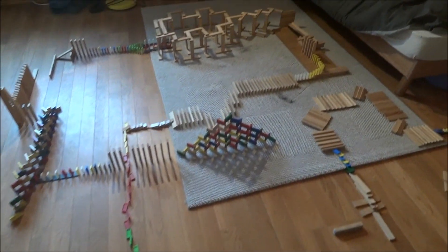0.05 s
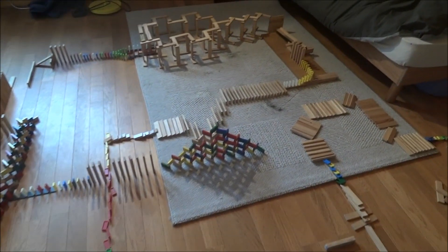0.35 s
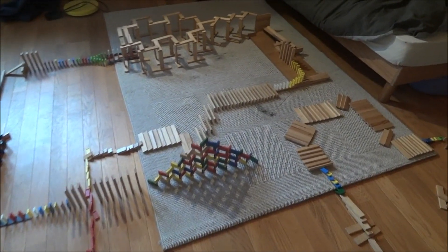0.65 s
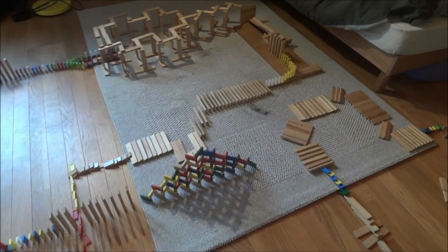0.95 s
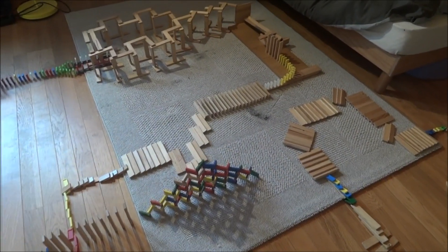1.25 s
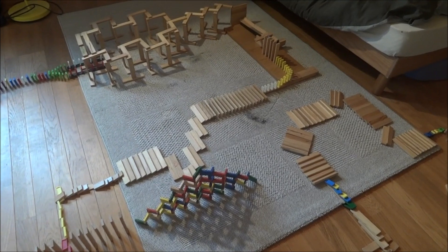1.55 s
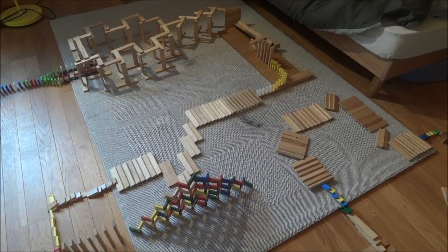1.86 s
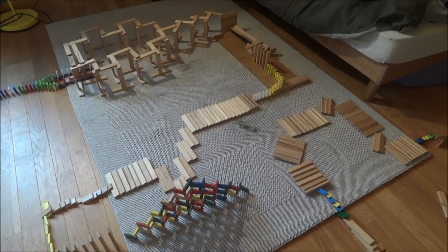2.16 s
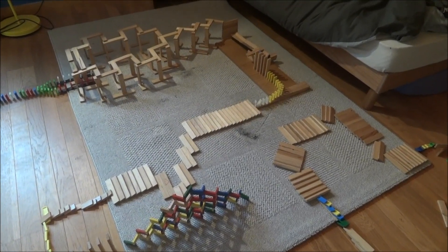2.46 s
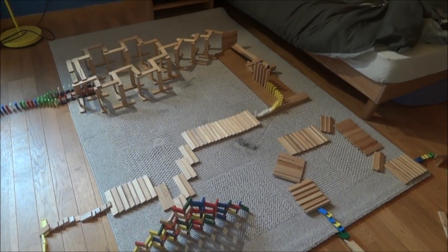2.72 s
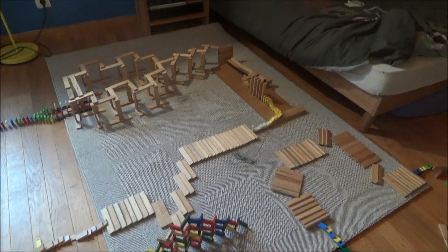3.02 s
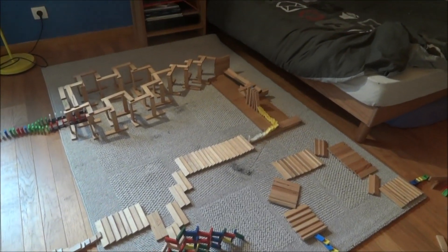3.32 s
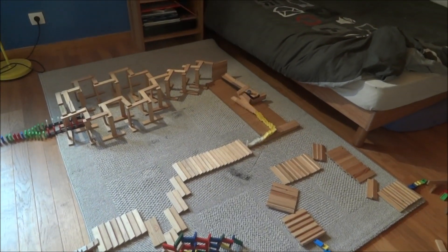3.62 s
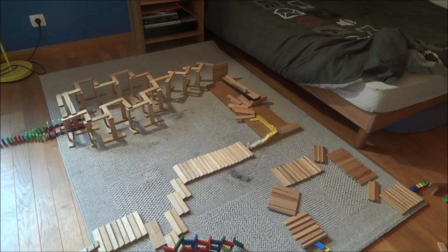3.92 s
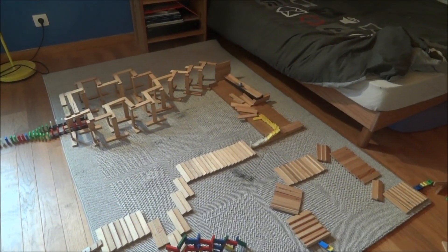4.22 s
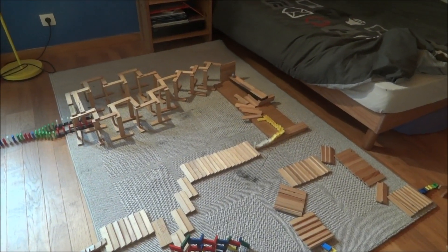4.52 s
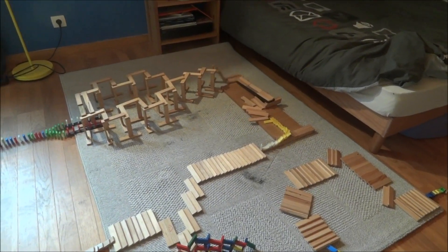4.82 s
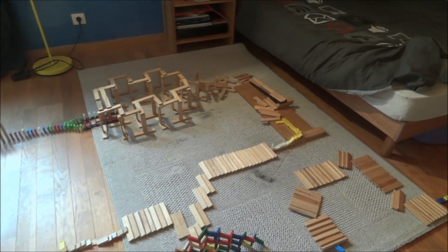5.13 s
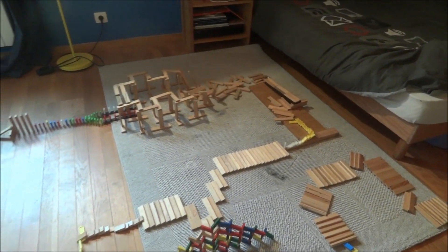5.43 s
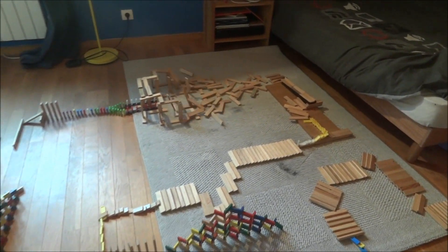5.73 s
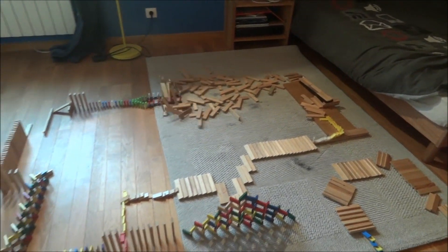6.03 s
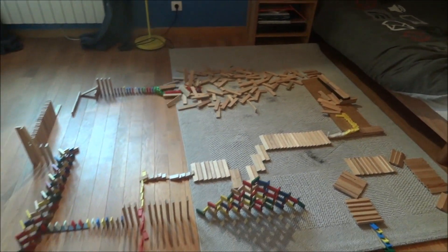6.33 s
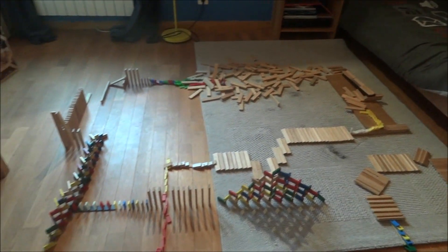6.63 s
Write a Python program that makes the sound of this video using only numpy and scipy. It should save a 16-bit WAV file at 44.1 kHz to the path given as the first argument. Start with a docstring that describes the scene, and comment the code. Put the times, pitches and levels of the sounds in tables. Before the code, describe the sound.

Wooden planks clack over one after another and dominoes tick along, building to a clattering collapse in a quiet room.

```python
"""Toppling planks and dominoes in a bedroom

Wooden planks clack over one by one across a rug and a wooden floor, dominoes tick along, a stack
tips onto a board, then a long scaffold of planks collapses and sets off more dominoes. Each blow
rings the piece's bending modes, snaps at the contact and knocks on what lies beneath.
Heard from close by on a hand-held camera's microphones, with short echoes and still air behind."""
import sys
import numpy as np
from scipy import signal
from scipy.io import wavfile
from scipy.ndimage import uniform_filter1d, minimum_filter1d

SR = 44100
rng = np.random.default_rng(int(sys.argv[2]) if len(sys.argv) > 2 else 0)


def materialize(psi):
    """Save the field psi as 16-bit PCM at rate SR to the path in sys.argv[1].

    A 1-D psi becomes a single channel; in a 2-D psi each row is a channel.
    """
    bounded = np.clip(np.atleast_2d(psi).T, -1, 1)
    quanta = np.round(bounded * 32767).astype(np.int16)
    wavfile.write(sys.argv[1], SR, quanta)


N = 302967
TIME = np.arange(N) / SR
BLOW = np.arange(3072) / SR  # seconds since a blow

# One plank hits the next, close by. Ring is its lowest modes, bright its overtones and snap.
# Each row: start in seconds, ring and bright in relative dB, pitch in Hz.
PLANK_HITS = [(.1846, -7, -30, 2230), (.2326, -7, -23.5, 3460), (.2907, -8, -26.5, 2645),
              (.3432, -6.5, -31, 2837), (.4062, -15, -49, 2660), (.4773, -12.5, -37, 2900),
              (.5568, -9.5, -44, 2717), (.6144, -11.5, -33, 2700), (.7235, -27, -44, 2595),
              (.814, -18, -47, 2835), (.873, -10, -41, 2804), (.9476, -12, -39, 2636),
              (.963, -11, -34.5, 2860), (1.0131, -11.5, -32, 2587), (1.1181, -9.5, -37.5, 2657),
              (1.183, -14, -34.5, 3117), (1.264, -6, -37, 2924), (1.2905, -23, -38, 2770),
              (1.4862, -8, -27, 2335), (1.5489, -9, -35, 2780), (1.6027, -7.5, -29, 3216),
              (1.6604, -7.5, -23, 2810), (1.706, -6, -26.5, 2793), (1.7402, -5.5, -27, 2750),
              (1.7782, -9.5, -27.5, 2160), (1.8247, -1, -32, 2574), (1.8717, -2.5, -22, 2750),
              (1.9144, -6, -28, 3420), (1.9579, -10.5, -24, 3250), (2.0105, -10.5, -40, 3330),
              (2.0473, -13, -28.5, 2760), (2.0921, -8, -26, 2955), (2.134, -9.5, -23.5, 2770),
              (2.176, -5, -20.5, 2740), (2.2242, -11.5, -19.5, 2770), (2.2623, -16.5, -56, 3140),
              (2.6967, -28, -47, 2710), (4.6668, -6, -20.5, 2750), (4.6978, -3.5, -27, 2920),
              (4.7489, 1, -14.5, 2705), (4.81, -4.5, -24, 2740), (4.8311, -4, -14.5, 3013),
              (5.034, -11.5, -19, 2930), (5.081, 1.5, -19, 2820), (5.1145, -1.5, -18, 2637),
              (5.1777, -3.5, -10.5, 2750), (5.246, -11, -41, 2643), (5.3761, -5, -22, 2680),
              (5.3875, -7.5, -12.5, 2650), (5.492, -12, -12, 2590), (5.5736, 3, -18, 2837),
              (5.6147, -3.5, -16, 2547), (5.6319, -11, -13.5, 2524), (5.874, -3.5, -47, 2520),
              (5.9194, -1, -53, 2540)]
# Fallen planks slip and chatter; in the last stretch the scaffold's first planks land with hollow knocks.
# One curve per stretch. Each row: time in seconds, ring, bright and knock in relative dB.
PLANK_CHATTER = [
    [(.19, -32, -44, -23), (.33, -32, -36, -18), (.42, -22, -32, -23), (.75, -23, -38.5, -36)],
    [(.95, -17, -43, -42), (1.32, -37, -48, -19)],
    [(1.5, -33, -37, -22.5), (1.85, -20, -32, -13.5), (2.1, -21, -44, -18.5), (2.3, -19, -24, -15.5)],
    [(4.745, -26, -40, -12), (4.8, -39, -36, -23), (4.88, -32, -40, -23), (5.0, -30, -36, -12),
     (5.11, -20, -24, -25)],
]
# A plank's modes, lowest first. Each row: frequency in Hz, level in dB, t60 in seconds.
PLANK_MODES = [(2750, 0, 0.069), (3420, -3, 0.017), (5950, 4.5, 0.0029), (6683, 3.5, 0.015),
               (7330, -2, 0.05), (10940, -16.5, 0.015)]
# Edges snapping together, and the knock on the rug. Each row: frequency in Hz, density in dB.
WOOD_SNAP = [(1500, -20), (3300, 7), (5000, 8), (6800, -1), (7700, 8), (9000, 3.5), (12800, 5),
             (14000, -10), (16000, -70)]
RUG_KNOCK = [(100, -47), (250, -52), (550, -7), (950, -1), (1600, 4.5), (2300, 8), (3700, 4), (5000, -9),
             (9000, -48), (16000, -58)]
# A kind of piece: modes, snap colour, knock colour, then ring, overtone, snap and knock weights in dB.
PLANK = (PLANK_MODES, WOOD_SNAP, RUG_KNOCK, [-6.5, -5.5, -8.5, -4.5])
# The hollow floor under the planks. Each row: resonance in Hz, width in Hz, gain in dB.
HOLLOW_FLOOR = [(734, 120, -21), (980, 53, 3.5), (1220, 140, -3.5)]


def planks(airborne_s=5.1, airborne_db=-27):
    """Planks clack over in a row, slip and chatter; the scaffold's first planks land with hollow knocks."""
    hits = single_blows(PLANK_HITS, [-11., -2.], knock_db=-10.5, heaviest_db=-24.5)
    hits[:, 3] += airborne_db * (hits[:, 0] > airborne_s)  # planks meeting in mid-air hardly knock
    clacks = strike(PLANK, hits, snap_t60=0.013, knock_t60=0.026, scatter=0.036, snap_db=-4.5)
    chatter = np.vstack([shower(curve, 80, 2800, 0.065, 6.0, [-9., -10., -5.])
                         for curve in PLANK_CHATTER])
    return hollow(clacks + strike(PLANK, chatter, snap_db=5.0), HOLLOW_FLOOR)


# Loose planks spill over the floor; the scaffold comes down bay by bay.
# Each row: start and length in seconds, ring and bright in relative dB.
SPILLS = [(0, .045, -14.5, -13), (6.772, 0.056, -20.5, -17)]
SCAFFOLD_BAYS = [(4.745, .04, -17, -24), (4.84, 0.058, -7, -11.5), (5.12, 0.19, -9, -15.5),
                 (5.255, 0.039, -15.5, -12), (5.375, 0.15, -15, -19), (5.51, 0.099, -19, -20),
                 (5.63, 0.14, -10, -13.5), (5.73, 0.15, -15, -16), (5.9, 0.096, -10.5, -16),
                 (5.99, 0.18, -11, -13.5), (6.19, 0.062, -25, -14), (6.33, 0.12, -16, -23.5)]
# The later bays drum harder on the floor. Each row: time in seconds, gain in dB.
SCAFFOLD_WEIGHT = [(4.7, -45), (5.2, -16.5), (5.45, -18), (6.6, -15.5)]


def collapses():
    """Groups of planks give way together: two brief spills and the scaffold's long fall onto the rug."""
    spills = np.zeros(N)
    for group in SPILLS:
        fall = giving_way([group], rise_s=0.0013, ring_db_per_s=95.0, bright_db_per_s=289.0,
                          drop_s=0.0019, knock_db=-5.0)
        blows = shower(fall, 300, 3080, 0.0176, 1.25, [-1., -3., 1.])
        spills += strike(PLANK, blows, scatter=0.096, snap_db=7.0)
        spills += drumming(fall, level_db=-21.0)
    fall = giving_way(SCAFFOLD_BAYS, rise_s=0.004, ring_db_per_s=162.0, bright_db_per_s=192.0,
                      drop_s=0.107, knock_db=-11.5)
    blows = shower(fall, 130, 2720, 0.0819, 4.0, [-1., -1., -1.])
    scaffold = strike(PLANK, blows, knock_t60=0.027, scatter=0.0593, snap_db=1.5)
    return spills + scaffold + drumming(fall, level_db=3.5) * follow(SCAFFOLD_WEIGHT)


# One domino hits the next. Each row: start in seconds, ring and bright in relative dB.
DOMINO_HITS = [(2.333, -3, -25.5), (2.3514, -1.5, -29), (2.5985, -13.5, -28), (2.6574, -22, -22),
               (2.6967, -31, -16.5), (2.7287, -5, -14), (2.7576, -7, -16.5), (2.7914, -23, -16.5),
               (2.828, -10, -26), (2.8635, -9, -29.5), (2.8944, -5.5, -18.5), (2.9111, -2, -24.5),
               (2.9407, -1.5, -36), (2.9783, -4, -30), (3.0024, -2, -12), (3.039, -8, -12),
               (6.5952, -8, -26), (6.6675, -2, -23)]
# Two fast runs: the climb onto the board, and the last line running off.
# Each row: time in seconds, ring, bright and knock in relative dB.
DOMINO_RUNS = [
    [(2.93, -30, -47, -24), (3.08, -8, -36, -18), (3.158, -8, -23, -12), (3.22, -18, -41, -19.5)],
    [(6.22, -40, -19, -7.5), (6.36, -13, -19.5, -5.5), (6.5, -11, -8.5, -4), (6.62, -5.5, -12.5, -5.5),
     (6.75, -22, -24, -7)],
]
# A domino's modes. Each row: frequency in Hz, level in dB, t60 in seconds.
DOMINO_MODES = [(4760, 6.5, 0.046), (4900, -2, 0.011), (7850, 9, 0.029), (10620, 11, 0.041)]
# Its snap, and its knock on the ground. Each row: frequency in Hz, density in dB.
DOMINO_SNAP = [(2000, -13), (3900, -3), (4800, 14), (6300, -9), (8000, -34), (9000, 2.5), (10500, 4),
               (11800, -6), (13500, -28), (16000, -55)]
DOMINO_KNOCK = [(100, -27), (400, -1), (620, -4.5), (850, -10), (1250, 2), (1800, 6), (2900, 12), (3700, 8),
                (6000, 6), (9000, 9.5), (16000, -3.5)]
DOMINO = (DOMINO_MODES, DOMINO_SNAP, DOMINO_KNOCK, [-9.5, -7, -16.5, -7])
# The hollow board they climb onto. Each row: resonance in Hz, width in Hz, gain in dB.
HOLLOW_BOARD = [(592, 15, 10), (1158, 31, 4), (1605, 15, -17)]


def dominoes(pitch_hz=4786, spread=0.0056):
    """Small hard tiles, all alike, tick at nearly one high pitch; in the fast runs the ticks merge."""
    pitches = pitch_hz * (1 + spread * rng.standard_normal(len(DOMINO_HITS)))
    rows = np.column_stack([DOMINO_HITS, pitches])
    hits = single_blows(rows, [-12., -2.], knock_db=-36.0, heaviest_db=-30.)
    ticks = strike(DOMINO, hits, snap_t60=0.0047, knock_t60=0.0207, scatter=0.0023,
                   overtone_share=0., snap_db=3.0, hardening=0.11)
    climb = shower(DOMINO_RUNS[0], 120, 4850, 0.048, 4.3, [-6., -6., -3.])
    last_run = shower(DOMINO_RUNS[1], 130, 4800, 0.015, 3.8, [-1., -3., -7.])
    on_board = hollow(strike(DOMINO, climb, scatter=.05, snap_db=5.0), HOLLOW_BOARD)
    return ticks + on_board + strike(DOMINO, last_run, scatter=0.0084, snap_db=5.0)


# Pieces land on bare wood. Each row: start in seconds, ring and bright in relative dB, pitch in Hz.
BOARD_HITS = [(3.0775, -24, -20.5, 2950), (3.1095, -25, -15.5, 3000), (3.1363, -14, -29, 2980),
              (3.1575, -2.5, -10.5, 2870), (3.2497, -33, -25.5, 2910), (3.3372, -33, -24.5, 2610),
              (3.4029, -31, -22.5, 2440), (3.454, -12, -19, 2880), (3.5785, -4, -19.5, 2580),
              (3.7565, -1, -21, 2180), (4.4025, -16.5, -43, 2270), (4.621, -17.5, -45, 2450),
              (6.756, -3.5, -24.5, 2480), (6.7834, -6.5, -31, 2230), (6.8151, -8.5, -34, 2190)]
# The stack tips in three parts, a little right of the microphones.
# Each row: start and length in seconds, ring and bright in relative dB.
STACK_FALLS = [(3.578, 0.054, -22.5, -13.5), (3.655, 0.051, -21, -8.5), (3.765, .185, -11, -16)]
# The heap shifts and settles. Each row: time in seconds, ring, bright and knock in relative dB.
SETTLING = [(4.15, -62, -69, -67), (4.462, -33, -45, -44), (4.58, -29, -72, -49)]
# Modes of a piece on the board, and in the stack. Each row: frequency in Hz, level in dB, t60 in seconds.
BOARD_MODES = [(2530, -2, 0.071), (3040, 12, 0.005), (6270, 4, 0.019), (7690, 5, 0.017), (11100, -17, 0.02)]
STACK_MODES = [(2430, 4, 0.032), (2900, 4.5, 0.034), (4720, -3.5, .015), (5190, -0.5, 0.019),
               (5750, -4, 0.051), (6530, -1, 0.011), (7480, 6, 0.0043)]
# The knock on bare wood. Each row: frequency in Hz, density in dB.
BOARD_KNOCK = [(100, -13), (220, -11.5), (600, 0), (830, 0.5), (1200, 5), (1900, 8), (4500, 3.5),
               (7000, -18.5), (10000, -52), (16000, -45)]
ON_BOARD = (BOARD_MODES, WOOD_SNAP, BOARD_KNOCK, [-8, -9.5, -21.5, 0.5])
STACKED = (STACK_MODES, WOOD_SNAP, BOARD_KNOCK, [-12, -8, -11, 0])


def stack():
    """A stack crashes onto a board and settles; other pieces land on bare wood."""
    hits = single_blows(BOARD_HITS, [-12., 0.], knock_db=-9.5, heaviest_db=-33.0)
    taps = strike(ON_BOARD, hits, snap_t60=0.0029, knock_t60=0.057, scatter=0.04,
                  overtone_share=0.011, snap_db=-9.5)
    fall = giving_way(STACK_FALLS, rise_s=0.0031, ring_db_per_s=288.0, bright_db_per_s=391.0,
                      drop_s=0.0013, knock_db=-4.5)
    crash = shower(fall, 280, 2330, 0.091, 4.4, [-1., 1., 0.])
    settling = shower(SETTLING, 54, 2510, 0.06, 5.6, [-6., -9., -3.])
    heap = strike(STACKED, np.vstack([crash, settling]), scatter=0.02, snap_db=-10.5)
    return hollow(taps, HOLLOW_BOARD) + heap + drumming(fall, level_db=-48.0)


# Planks bounce free, close by. Each row: start in seconds, level in dB, pitch in Hz.
PINGS = [(2.227, -6.5, 5950), (3.832, -6.5, 5660), (5.782, -3.5, 5680), (6.045, -2.5, 5750),
         (6.175, -5, 6020)]


def pings(t60=0.028, rock_s=3.85, rock_db=-7.5, rock_hz=5360, bounces=11, loss_db=3.2):
    """A plank that bounces free keeps one upper mode ringing; the stack's last plank rocks to rest."""
    out, bounce = np.zeros(N), np.arange(bounces)
    gaps_s = .03 * .92 ** bounce  # ever quicker bounces
    starts = rock_s + np.cumsum(gaps_s) - gaps_s
    rocking = np.column_stack([starts, rock_db - loss_db * bounce, np.full(bounces, rock_hz)])
    for s, db, hz in np.vstack([PINGS, rocking]):
        add(out, s, gain_of(db - 60 * BLOW / t60) * np.sin(2 * np.pi * hz * BLOW))
    return out


# Heavy pieces hit the floor. Each row: start in seconds, relative level in dB, pitch in Hz.
THUMPS = [(3.579, -19, 322), (3.608, -21, 206), (5.423, -24, 366.4), (5.548, -22.5, 422), (5.597, -36, 400),
          (5.845, -27.5, 377), (6.091, -20, 304), (6.219, -17.5, 389), (6.325, -14.5, 454),
          (6.36, -17.5, 427)]


def floorboards(thump_t60=0.06, knock_t60=0.13, knock_db=-4.5):
    """The heaviest pieces land with a knock and a hollow thump of three floor modes."""
    out, knocks = np.zeros(N), bursts(BOARD_KNOCK, knock_t60, count=len(THUMPS))
    for (s, db, hz), knock in zip(THUMPS, knocks):
        boards = sum(np.sin(2 * np.pi * hz * ratio * BLOW) * size
                     for ratio, size in [(.55, -0.15), (1, 0.92), (1.45, -0.52)])
        thump = gain_of(db + 1.0) * boards * gain_of(-60 * BLOW / thump_t60)
        add(out, s, thump + gain_of(db + knock_db) * knock)
    return out


# The floor's thud under a collapse. Each row: frequency in Hz, density in dB.
FLOOR_THUD = [(50, -24), (130, -50), (200, -11), (350, 11), (480, 5), (700, -16.5), (1500, -53),
              (8000, -100)]


def drumming(curve, level_db, per_s=120):
    """The floor drums under a shower, as strongly as the pieces knock on it."""
    blows = rng.standard_normal(N) * (rng.random(N) < per_s / SR)
    return gain_of(level_db) * coloured(blows, FLOOR_THUD)[0] * follow(curve[:, [0, 3]])


def strike(piece, rows, snap_t60=0.006, knock_t60=0.025, scatter=0.068, overtone_share=0.085,
           snap_db=0., hardening=0.76, rebound_db=-6.0):
    """Blows ring a piece. Each row: start in seconds, ring, bright and knock in dB, pitch in Hz."""
    modes, snap_colour, knock_colour, weight_db = piece
    mode_hz, mode_db, t60 = np.transpose(modes)
    fades = gain_of(mode_db[:, None] - 60 * BLOW / t60[:, None])
    low = np.arange(len(modes)) < 2
    snaps, knocks = bursts(snap_colour, snap_t60), bursts(knock_colour, knock_t60)
    out = np.zeros(N)
    for s, ring_db, bright_db, knock_db, pitch in rows:
        # the lowest mode sets the pitch; the others depend on the grain and follow it only partly
        grain = 1 + scatter * rng.standard_normal(len(modes))
        hz = mode_hz * (pitch / mode_hz[0]) ** overtone_share * grain
        hz[0] = pitch
        waves = fades * np.sin(2 * np.pi * hz[:, None] * BLOW) * rng.choice([-1, 1], (len(modes), 1))
        snap, rebound = snaps[rng.integers(len(snaps), size=2)]
        knock = knocks[rng.integers(len(knocks))]
        # the brighter the blow, the shorter the contact and the more it snaps
        contact_db = bright_db + snap_db + hardening * np.clip(bright_db - ring_db, -20, 6)
        gains = gain_of(np.add([ring_db, bright_db, contact_db, knock_db], weight_db))
        ring, overtones = unit_rms(waves[low].sum(0)), unit_rms(waves[~low].sum(0))
        add(out, s, gains @ np.array([ring, overtones, snap, knock]))
        # the pieces touch once more a few milliseconds later
        add(out, s + rng.uniform(.002, .009), gains[2] * gain_of(rebound_db) * rebound)
    return out


def single_blows(rows, trim_db, knock_db, heaviest_db):
    """Rows for strike; the knock grows with the blow's force, up to what the piece's weight can give."""
    s, ring_db, bright_db, pitch = np.transpose(rows)
    knock = np.minimum((ring_db + bright_db) / 2 + knock_db, heaviest_db)
    return np.column_stack([s, ring_db + trim_db[0], bright_db + trim_db[1], knock, pitch])


def shower(curve, per_s, pitch_hz, spread, uneven_db, trim_db):
    """Rows of random blows whose summed power follows a curve."""
    s, *levels = np.transpose(curve)
    count = max(int((s[-1] - s[0]) * per_s), 1)
    chance = rng.standard_normal((count, 5))
    when = s[0] + (np.arange(count) + rng.random(count)) * (s[-1] - s[0]) / count
    # each blow has a force of its own, and shares it differently between its parts
    force = unit_rms(gain_of(uneven_db * np.clip(chance[:, 0] + .5 * chance[:, 2:].T, -2, 2)))
    curve_db = [np.interp(when, s, db) for db in levels]
    blow_db = 20 * np.log10(force / np.sqrt(per_s * BLOW[-1])) + curve_db
    return np.column_stack([when, blow_db.T + trim_db, pitch_hz * (1 + spread * chance[:, 1])])


def giving_way(groups, rise_s, ring_db_per_s, bright_db_per_s, drop_s, knock_db):
    """Level curves: each group clatters in the air, holds and fades, and lands one drop later."""
    start, length, ring_db, bright_db = np.transpose(groups)[:, :, None]
    s = np.linspace(start.min(), (start + length).max() + .2, 500)

    def level(age, db, fade_db_per_s):
        gain = np.clip(age / rise_s, 0, 1) * gain_of(db - fade_db_per_s * np.maximum(age - length, 0))
        return 10 * np.log10((gain ** 2).sum(0) + 1e-12)

    ring = level(s - start, ring_db, ring_db_per_s)
    bright = level(s - start, bright_db, bright_db_per_s)
    knock = level(s - start - drop_s, (ring_db + bright_db) / 2 + knock_db, ring_db_per_s)
    return np.column_stack([s, ring, bright, knock])


def hollow(x, resonances):
    """Adds the resonances of the surface that the blows shake."""
    return x + sum(gain_of(db) * signal.lfilter(*signal.iirpeak(hz, hz / width, SR), x)
                   for hz, width, db in resonances)


def bursts(spectrum, t60, count=32):
    """A stock of short dying noises: many heavily damped modes at once."""
    return coloured(rng.standard_normal((count, len(BLOW))) * gain_of(-60 * BLOW / t60), spectrum)


def coloured(x, spectrum, size=4096):
    """Causal filter with the given spectrum, row by row; rms 1."""
    log_gain = np.log(gain_of(at_hz(spectrum, abs(np.fft.fftfreq(size, 1 / SR)))))
    taps = np.fft.ifft(np.exp(np.conj(signal.hilbert(log_gain)))).real[:size // 2]
    return unit_rms(signal.fftconvolve(np.atleast_2d(x), taps[None], axes=1)[:, :x.shape[-1]])


def gain_of(db):
    """Decibels to amplitude."""
    return 10 ** (np.asarray(db) / 20)


def unit_rms(x):
    """Scales each row to rms 1."""
    return x / np.sqrt(np.mean(x ** 2, axis=-1, keepdims=True) + 1e-20)


def at_hz(points, hz):
    """Reads a table on a log-frequency axis."""
    f, value = np.transpose(points)
    return np.interp(np.log(hz + 1), np.log(f + 1), value)


def follow(rows):
    """Gain along a level curve, silent outside it."""
    s, db = np.transpose(rows)
    return np.interp(TIME, s, gain_of(db), left=0, right=0)


def add(mix, s, sound):
    """Mixes a sound in at s seconds."""
    part = mix[max(round(s * SR), 0):][:len(sound)]
    part += sound[:len(part)]


# How long the bedroom rings around the microphones. Each row: frequency in Hz, t60 in seconds.
ROOM_DECAY = [(250, 0.19), (700, 0.53), (1700, 0.43), (4500, 0.34), (8000, 0.33), (13000, 0.11)]


def echoes(early_db=-4., early_t60=0.093):
    """Mid and side from one place: direct sound, early echoes off floor and furniture, a short tail."""
    t = np.arange(SR * 3 // 4) / SR
    taps = rng.standard_normal((2, len(t))) * (rng.random((2, len(t))) < .08) * (t > .006)
    hz, when, spectra = signal.stft(taps, SR, nperseg=256)
    decay = gain_of(-60 * when / at_hz(ROOM_DECAY, hz)[:, None])
    tail = signal.istft(spectra * decay, SR, nperseg=256)[1][:, :len(t)]
    early_taps = rng.choice([-1, 1], taps.shape) * (rng.random(taps.shape) < .015) * (t > .001)
    early = early_taps * gain_of(-60 * t / early_t60)
    echo = (unit_rms(tail) + gain_of(early_db) * unit_rms(early)) / np.sqrt(len(t))
    echo[0, 0] = 1  # direct sound
    return echo / np.linalg.norm(echo[0])


def room(x, side_db=-12.0, places=4):
    """Pieces fall in different places, so echoes take turns; both microphones hear nearly the same."""
    place = (TIME * 28).astype(int) % places
    shares = [np.sqrt(abs(uniform_filter1d((place == k) * 1., 200))) for k in range(places)]
    mid, side = sum(signal.oaconvolve((x * share)[None], echoes(), axes=1)[:, :N] for share in shares)
    return np.array([mid + gain_of(side_db) * side, mid - gain_of(side_db) * side])


# Still air all round, and a low rough drone in the centre. Each row: frequency in Hz, density in dB.
STILL_AIR = [(20, -5), (70, 4.5), (140, -2), (250, -5.5), (380, 7.5), (600, -7.5), (1100, 6), (2500, -5.5),
             (4500, -21), (9500, -10), (15800, -31)]
DRONE = [(100, -28.5), (260, -18), (350, 11), (400, -1), (500, -19), (1000, -28), (8000, -69)]
# The drone comes and goes. Each row: time in seconds, relative level in dB.
DRONE_LEVEL = [(0, -37), (.25, -51), (.75, -45), (1, -90), (2, -51), (3.5, -53.5)]
# Soft bumps right at the camera. Each row: start in seconds, level in dB, pitch in Hz.
CAMERA_BUMPS = [(2.527, -39, 216), (2.92, -40.5, 55.7), (2.97, -38.5, 41.7), (3.18, -47, 39.7)]


def background(air_db=-51.5, bump_s=0.0033):
    """Still air, a faint low drone, and soft bumps at the camera."""
    mid, side = gain_of(air_db) * coloured(rng.standard_normal((2, N)), STILL_AIR)
    drone = coloured(rng.standard_normal(N), DRONE)[0] * follow(DRONE_LEVEL)
    mid = mid + gain_of(-1.5) * drone
    for s, db, hz in CAMERA_BUMPS:
        age = np.maximum(TIME - s, 0)
        mid += gain_of(db) * np.sin(2 * np.pi * hz * age) * age / bump_s * np.exp(1 - age / bump_s)
    return np.array([mid + .25 * side, mid - .25 * side])


# Where the action is, heard from the camera. Each row: time in seconds, left minus right in dB.
PAN = [(0, 1), (1.2, 0.7), (2.2, 0), (3.2, -2), (4.2, -1.5), (5.2, -0.5), (6.87, 0.5)]


def scene(lowest_hz=180):
    """All the falling wood in the room, drifting a little between left and right."""
    wood = room(planks() + dominoes() + stack() + collapses() + pings() + floorboards())
    # the wood is heard with almost no bass
    wood = signal.sosfilt(signal.butter(3, lowest_hz, "high", fs=SR, output="sos"), wood)
    pan_db = np.interp(TIME, *np.transpose(PAN))
    return wood * gain_of([pan_db / 2, -pan_db / 2]) + background()


def record(dry, ceiling=.92, edge_hz=15900):
    """The camera's fast limiter holds the peaks down; a steep low-pass then cuts the top treble."""
    allowed = ceiling / np.maximum(abs(dry).max(0), ceiling)
    limited = dry * uniform_filter1d(minimum_filter1d(allowed, 131), 131)
    low_pass = signal.firwin(511, edge_hz, window=("kaiser", 9), fs=SR)
    return signal.oaconvolve(limited, low_pass[None], "same")


dry = scene()
out = record(dry)
materialize(out)
```